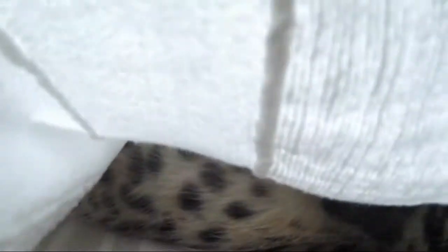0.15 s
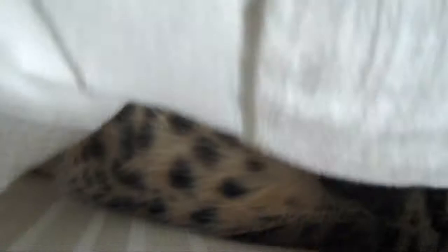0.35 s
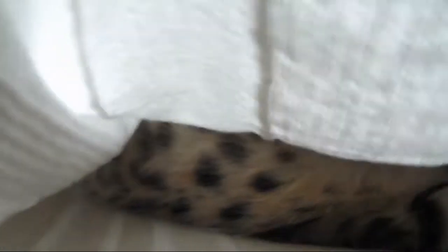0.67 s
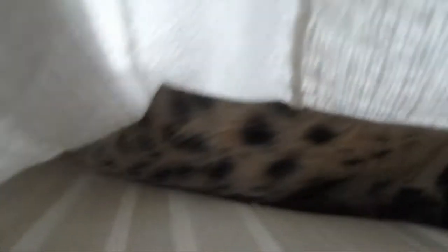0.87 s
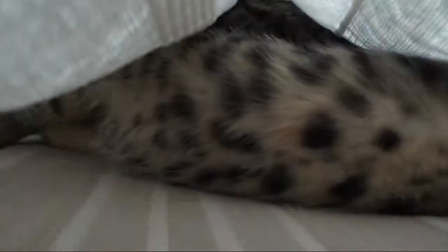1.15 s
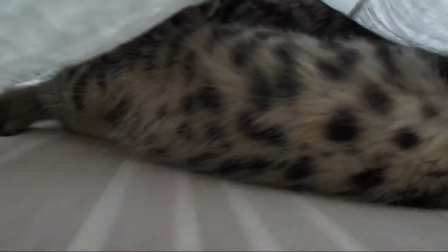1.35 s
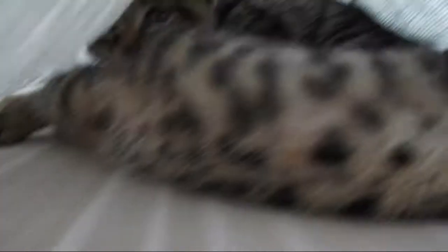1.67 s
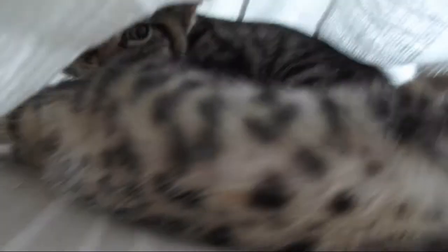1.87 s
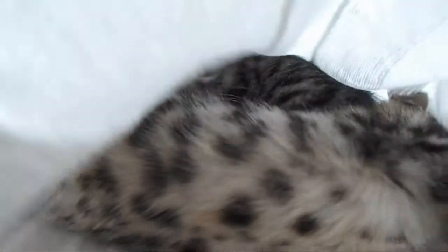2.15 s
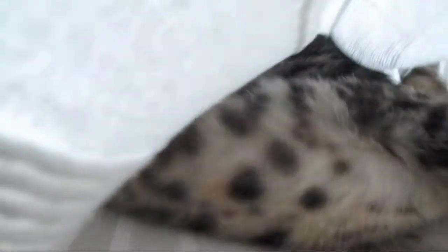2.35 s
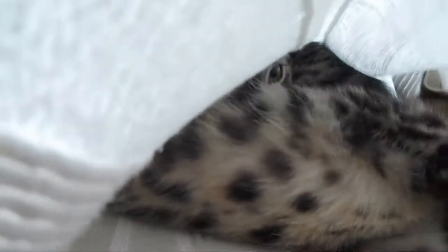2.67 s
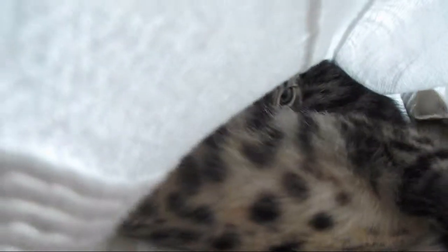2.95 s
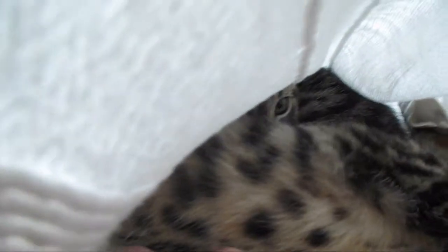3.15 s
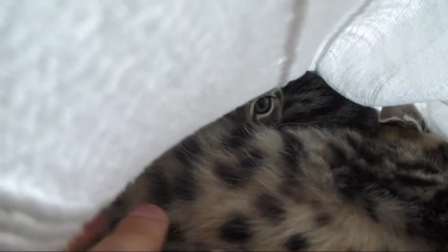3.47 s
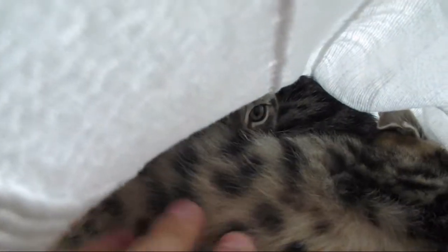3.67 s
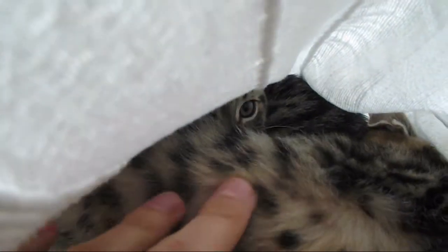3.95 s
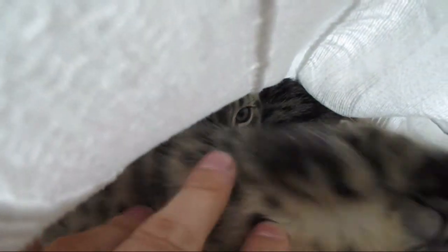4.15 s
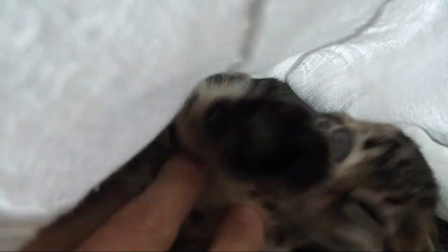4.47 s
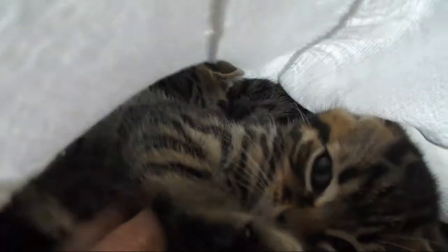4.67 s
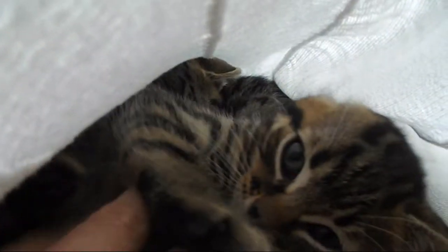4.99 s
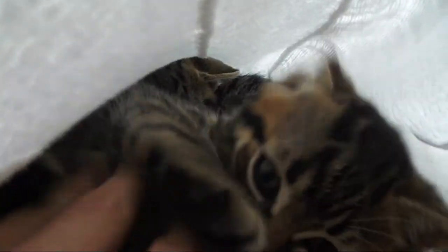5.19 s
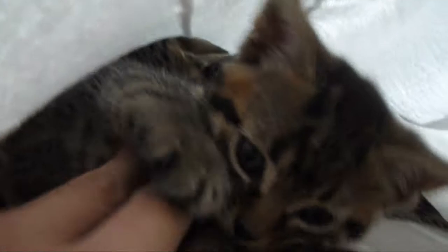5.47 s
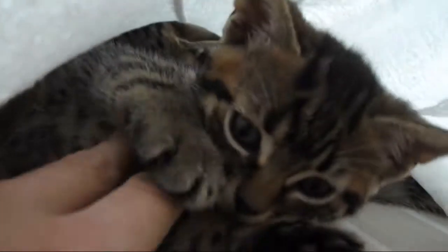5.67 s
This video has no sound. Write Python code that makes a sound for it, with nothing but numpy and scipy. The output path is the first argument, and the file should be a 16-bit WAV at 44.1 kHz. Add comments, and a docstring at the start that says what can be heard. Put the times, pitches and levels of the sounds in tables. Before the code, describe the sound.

Very close handling noise under a sheet: muffled thumps, dry hard snaps, a burst of fabric scraping, faint fur stroking and constant hiss.

```python
"""The case of a small handheld camera clicks, creaks and bumps as cloth brushes it among bedding.
Snapping seams ring panel and shell modes; sliding cloth is a mass of tiny thread slips plus a low push.
The camera sways and shuffles, a hand strokes a kitten's fur and the sheet, and hiss runs throughout.
The hardest clicks overload the microphone, and its gain control ducks for a moment after them."""
import sys
import numpy as np
from scipy import signal
from scipy.fft import rfft, irfft
from scipy.io import wavfile

SR = 44100
rng = np.random.default_rng(int(sys.argv[2]) if len(sys.argv) > 2 else 0)


def dump(signal):
    """Clip the signal to [-1, 1] and save it as 16-bit WAV at the path in sys.argv[1]."""
    limited = np.clip(np.atleast_2d(signal).T, -1, 1)
    pcm = np.round(limited * 32767).astype(np.int16)
    wavfile.write(sys.argv[1], SR, pcm)


N = 256662
TIME_S = np.arange(N) / SR
BIN_HZ = np.fft.rfftfreq(N, 1 / SR)

# All levels are ahead of the gain control.
# Seam snaps: t/s, panel peak level/dB, panel f/Hz, panel t60/s, shell peak re panel/dB
CLICKS = [(0.5052, -3, 2450, 0.014, -13), (.5060, -11, 4200, 0.015, -21), (.5180, -17, 2700, 0.026, -17),
          (0.5704, -18, 4120, 0.011, 0), (1.0172, -20, 1770, 0.0035, -4), (1.0967, -17, 2220, .012, 14.5),
          (1.1009, 10, 4150, 0.006, -6.5), (1.1039, 2.5, 2640, 0.0054, -7), (1.1054, 2, 1720, 0.011, -11),
          (1.1223, -15, 4700, 0.011, 2.5), (1.1777, -27.5, 1180, .008, 2), (1.2047, -21, 3120, .0056, 2),
          (1.2502, -22, 980, 0.026, 0), (1.5220, -12.5, 2170, 0.019, -2.5),
          (1.5327, -13.5, 1860, 0.018, -2.5), (1.6735, -33.5, 2000, 0.0041, 12),
          (2.6449, 14, 4175, 0.026, 0), (2.6470, 1, 1900, 0.012, 6), (2.657, 12.5, 4100, 0.0042, -16),
          (2.6669, 9.5, 4200, 0.0055, -4.5), (2.6681, -7, 940, .007, -2), (2.9605, -16.5, 4300, 0.012, -9),
          (4.4914, -19, 4270, .007, -17)]
# Case modes: f/Hz, relative level/dB, t60/s
SHELL_MODES = [(470, -28, 0.049), (863, -15, 0.015), (1100, -8, 0.0043), (1700, -5, 0.0053),
               (2345, 0.5, 0.0053), (3170, 4, 0.0019), (3910, 0, 0.0043), (4197, 5, 0.0037),
               (5160, -12, 0.021), (6500, -5, 0.0016), (7400, 2.5, 0.00087), (11400, -3.5, 0.0011)]
# Stick-slip squeak of the case: t/s, f/Hz, level/dB
SQUEAK = [(2.692, 2410, -25), (2.704, 2500, -20), (2.713, 2480, -19), (2.722, 2510, -32)]
# Squeak partials: multiple of f, relative level/dB
SQUEAK_PARTIALS = [(1, -5), (2, -2.5), (3, -13)]
# Soft blows on the case: t/s, peak level/dB, half width/s
BUMPS = [(0.1029, -13, 0.0011), (.1235, -29.5, 0.006), (0.1763, -23.5, .0015), (.217, -32, .0078),
         (0.3092, -23.5, 0.0012), (0.378, -27.5, 0.0098), (1.02, -28.5, 0.0066), (2.0338, -23, 0.0021),
         (2.0546, -23, .0016), (4.3848, -28, 0.0017), (4.5045, -22, 0.0041), (5.305, -35, .0018),
         (5.431, -34.5, 0.0011)]
# Cloth slides on the case: t/s, length/s, level before tension gains/dB, tautness (0 slack, 1 stretched)
BRUSHES = [(0.5, 0.097, -37, 0.45), (.658, .03, -37.5, .35), (1.878, 0.028, -37.5, 0.3),
           (2.028, 0.093, -28.5, 0.094), (2.113, 0.038, -35, .05), (2.146, .083, -29.5, 0.26),
           (2.223, 0.072, -39.5, 0.17), (2.336, .11, -32.5, 0.19), (2.544, 0.18, -34.5, 0.22),
           (2.648, 0.054, -18.5, 0.74), (2.701, 0.11, -32, 0.24), (2.79, 0.026, -32, 1.0),
           (2.813, 0.25, -36, 0.18), (2.948, 0.033, -39.5, 0.35), (3.82, .09, -44.5, 0.18),
           (4.474, 0.054, -42.5, 0.076)]
# Bedding shifting under the hand that holds the camera: t/s, level/dB
SHIFTING = [(0, -44.5), (.5, -49), (.75, -53), (1.05, -43.5), (1.2, -54), (1.75, -52), (2.1, -45.5),
            (2.5, -46), (2.92, -35), (3.1, -44.5), (3.85, -48), (4.2, -54), (4.45, -43.5), (4.8, -54.5),
            (5.15, -54.5), (5.3, -46.5), (5.55, -51.5), (5.82, -50)]
# Other hand stroking fur and sheet: t/s, level before the trim in stroking()/dB
STROKING = [(0, -41), (.65, -37.5), (.8, -43), (1.05, -44), (1.6, -47), (3.5, -51.5), (4.3, -41.5),
            (4.75, -40.5), (5.1, -54), (5.82, -73)]
# Resonances of the hollow in front of the microphone: f/Hz, width/Hz, lift/dB
CAVITY = [(1696, 290, 10), (2338, 224, 11.5), (2558, 85, 8), (2944, 540, 6.5), (3743, 270, 8),
          (4302, 590, 16), (4763, 393, 9), (5300, 110, 10), (6190, 850, 7.5), (8340, 640, 4),
          (9520, 770, 11.5), (10850, 530, 6)]
# Relative spectrum of hiss and stroking, before the cavity: f/Hz, density/dB
HISS_SPECTRUM = [(20, 19.5), (100, -1), (280, 1), (600, -6), (1200, -6), (2400, -5.5), (4600, -7.5),
                 (5550, -16.5), (7500, -14), (10400, -18.5), (12300, -21), (15600, -27)]
# Relative spectrum of rasping threads, before the cavity: f/Hz, density/dB
CLOTH_SPECTRUM = [(200, -5), (600, -17), (1050, -9.5), (1750, 2.5), (2400, -3), (3400, -9.5), (3950, 2.5),
                  (4600, -1.5), (5200, -6.5), (5700, -16), (7600, -17), (8600, -14.5), (11000, -26),
                  (15600, -37)]
# Relative spectrum of cloth pushing on the case: f/Hz, density/dB
PUSH_SPECTRUM = [(20, -21), (60, 8), (140, 7), (300, 0.5), (550, -3.5), (1200, -17.5), (3000, -80)]
# Relative spectrum of the swaying camera: f/Hz, density/dB
SWAY_SPECTRUM = [(8, 7.5), (25, -1), (55, 2.5), (100, -5), (200, -42), (600, -64)]
# Relative spectrum of the shuffling camera: f/Hz, density/dB
SHUFFLE_SPECTRUM = [(30, -29), (120, -3), (260, -7), (500, -14.5), (1100, -22.5), (3000, -38)]

RECOIL_DB, RECOIL_S = -27.5, 0.00047  # case jolt from a click: re click, half width
SCUFF_DB, SCUFF_S = -17.5, 0.012  # cloth crushed by a bump: re bump, decay time constant
CATCH_S, SLOWING_SHARE = 0.0044, 0.5  # a fold starts at once, slows over this share of its slide
SLACK_PUSH_DB, TAUT_PUSH_DB = 3.5, -22  # taut cloth hardly pushes
SLACK_EDGE_DB, TAUT_EDGE_DB = 0.5, 14  # taut threads rasp more sharply
SETTLE_RISE_S, SETTLE_S = 0.0053, 0.052  # rocking on the mattress after a bump
BUMP_SWAY_DB, BUMP_SHUFFLE_DB = -7.5, -33  # re bump, before the settling envelope
DRAG_SWAY_DB = -9  # sway under a sliding fold, re its push
QUIET_DB, SWAY_DB_PER_DB = -49.5, 0.49  # sway slope against shifting, pivot at the quiet level
HISS_DB = -39.5
BAND_EDGE_HZ = 15800


def gain_of(db):
    """Decibels to amplitude."""
    return 10 ** (np.asarray(db) / 20)


def evened(x):
    """Scales to rms 1."""
    return x / np.sqrt(np.mean(x ** 2) + 1e-20)


def spectrum_db(points):
    """Interpolates a short dB spectrum over all bins, on a log frequency axis."""
    f_hz, db = np.transpose(points)
    return np.interp(np.log(BIN_HZ + 1), np.log(f_hz + 1), db)


def coloured(x, db):
    """Filters x by a dB spectrum, then scales to rms 1."""
    return evened(irfft(rfft(x) * gain_of(db), N))


def follow(rows, axis=1):
    """One dB column of a timed curve as a gain per sample."""
    columns = np.transpose(rows)
    return gain_of(np.interp(TIME_S, columns[0], columns[axis]))


def wander(rate_hz):
    """Slow random drift of rms 1: noise under a Gaussian low-pass."""
    white = rng.standard_normal(N)
    return evened(irfft(rfft(white) * np.exp(-(BIN_HZ / rate_hz) ** 2), N))


def add(mix, start_s, sound):
    """Mixes a sound in, in place, cut at the end of the mix."""
    part = mix[round(start_s * SR):][:len(sound)]
    part += sound[:len(part)]


def fibres(per_s, spread_db, clump_db, clump_hz):
    """Threads catch and let go: tiny slips of uneven size that come in clumps."""
    excess = np.minimum(rng.exponential(1, N), 4)
    size = gain_of(spread_db * excess) * rng.standard_normal(N)
    slips = rng.random(N) < per_s / SR
    return evened(size * slips * gain_of(clump_db * wander(clump_hz)))


def cavity_db():
    """Lift by the hollow in front of the microphone: a sum of resonant peaks."""
    lift_db = np.zeros(len(BIN_HZ))
    for f_hz, width_hz, peak_db in CAVITY:
        lift_db += peak_db / (1 + (2 * (BIN_HZ - f_hz) / width_hz) ** 2) ** 0.92
    return lift_db


def clicks(contact_cycles=0.095, grit=0.18, grit_s=0.0029, panel_grit=0.62, scatter=0.0099):
    """A seam snaps: one panel rings briefly, and the snap with its trailing grit shakes the shell."""
    t = np.arange(SR // 20) / SR
    out = np.zeros(N)
    for start_s, db, panel_hz, t60_s, shell_db in CLICKS:
        contact = t * panel_hz / contact_cycles  # a lower panel lets go more slowly
        snap = contact * np.exp(-contact)
        trail = grit * rng.standard_normal(len(t)) * np.exp(-t / grit_s)
        scrape = signal.fftconvolve(snap, trail)[:len(t)]

        flex = np.cos(2 * np.pi * panel_hz * t) * gain_of(-60 * t / t60_s)
        panel = signal.fftconvolve(snap + panel_grit * scrape, flex)[:len(t)]

        detune = 1 + scatter * rng.standard_normal(len(SHELL_MODES))
        modes = np.zeros(len(t))
        for k, (f_hz, mode_db, ring_s) in enumerate(SHELL_MODES):
            phase = 2 * np.pi * f_hz * detune[k] * t + k * np.pi  # alternating sign
            modes += gain_of(mode_db - 60 * t / ring_s) * np.cos(phase)
        shell = signal.fftconvolve(snap + scrape, modes)[:len(t)]

        ring = panel / abs(panel).max() + gain_of(shell_db) * shell / abs(shell).max()
        add(out, start_s, gain_of(db) * ring)
    return out


def squeak(jitter=0.0123, jitter_hz=680, flutter_db=2.5, flutter_hz=300):
    """Slips briefly fall into step: a rough, rising harmonic tone."""
    t_s, f_hz, _ = np.transpose(SQUEAK)
    pitch_hz = np.interp(TIME_S, t_s, f_hz) * (1 + jitter * wander(jitter_hz))
    turns = np.cumsum(pitch_hz) / SR
    tone = sum(gain_of(db) * np.sin(2 * np.pi * round(k) * turns) for k, db in SQUEAK_PARTIALS)
    rough = evened(tone * gain_of(flutter_db * wander(flutter_hz)))
    sounding = (TIME_S > t_s[0]) * (TIME_S < t_s[-1])
    return follow(SQUEAK, axis=2) * sounding * rough


def bumps():
    """A padded blow or a click's recoil moves the microphone in and back: one swing of pressure."""
    out = np.zeros(N)
    recoils = [(start_s, db + RECOIL_DB, RECOIL_S) for start_s, db, *_ in CLICKS]
    for centre_s, db, width_s in BUMPS + recoils:
        u = np.arange(-4 * width_s, 4 * width_s, 1 / SR) / width_s
        add(out, centre_s - 4 * width_s, -gain_of(db) * u * np.exp((1 - u ** 2) / 2))
    return out


def scuffs():
    """Each bump crushes a fold of cloth against the case: decaying thread slips."""
    t = np.arange(SR // 5) / SR
    crush = np.zeros(N)
    for start_s, db, _ in BUMPS:
        add(crush, start_s, gain_of(db + SCUFF_DB) * np.exp(-t / SCUFF_S))
    slips = fibres(per_s=2500, spread_db=4.5, clump_db=2.0, clump_hz=60)
    return crush * coloured(slips, spectrum_db(PUSH_SPECTRUM))


def swell(length_s):
    """Loudness of one slide: the root of a speed that builds up and dies away."""
    t = np.arange(round(length_s * SR)) / SR
    slowing = (1 - t / length_s) / SLOWING_SHARE
    return np.sqrt(np.minimum(1, np.minimum(t / CATCH_S, slowing)))


def tension(taut):
    """Gains of low push and sharp edge: stretching cloth trades one for the other."""
    push_db = SLACK_PUSH_DB + taut * (TAUT_PUSH_DB - SLACK_PUSH_DB)
    edge_db = SLACK_EDGE_DB + taut * (TAUT_EDGE_DB - SLACK_EDGE_DB)
    return gain_of(push_db), gain_of(edge_db)


def brushes(cavity_share=0.16, edge_hz=3300):
    """Threads rasp on the case, sharper when taut, while coarser folds rumble through it."""
    threads = fibres(per_s=7000, spread_db=1.5, clump_db=1.7, clump_hz=170)
    folds = fibres(per_s=740, spread_db=0.0, clump_db=-2.2, clump_hz=40)
    rasp = coloured(threads, spectrum_db(CLOTH_SPECTRUM) + cavity_share * cavity_db())
    body = irfft(rfft(rasp) / (1 + (BIN_HZ / edge_hz) ** 8), N)
    edge = rasp - body
    push = coloured(folds + 0.87 * threads, spectrum_db(PUSH_SPECTRUM))
    out = np.zeros(N)
    for start_s, length_s, db, taut in BRUSHES:
        push_gain, edge_gain = tension(taut)
        slide = gain_of(db) * swell(length_s)
        first = round(start_s * SR)
        span = slice(first, first + len(slide))
        add(out, start_s, slide * (body[span] + edge_gain * edge[span] + push_gain * push[span]))
    return out


def grip(sway_db=-46.5, shuffle_db=0):
    """Camera sways and shuffles on the mattress: gently all along, more after bumps; cloth drag adds sway."""
    t = np.arange(SR) / SR
    settling = (1 - np.exp(-t / SETTLE_RISE_S)) * np.exp(-t / SETTLE_S)
    rocking, drag = np.zeros(N), np.zeros(N)
    for start_s, db, _ in BUMPS:
        add(rocking, start_s, gain_of(db) * settling)
    for start_s, length_s, db, taut in BRUSHES:
        push_gain, _ = tension(taut)
        add(drag, start_s, gain_of(db) * push_gain * swell(length_s))

    shifting = follow(SHIFTING)
    sway = coloured(rng.standard_normal(N), spectrum_db(SWAY_SPECTRUM))
    unsteady = gain_of(sway_db) * (shifting / gain_of(QUIET_DB)) ** SWAY_DB_PER_DB
    pushed = gain_of(BUMP_SWAY_DB) * rocking + gain_of(DRAG_SWAY_DB) * drag

    slips = fibres(per_s=2700, spread_db=1.0, clump_db=3.5, clump_hz=30)
    shuffle = coloured(slips, spectrum_db(SHUFFLE_SPECTRUM))
    shuffle_gain = np.hypot(gain_of(shuffle_db) * shifting, gain_of(BUMP_SHUFFLE_DB) * rocking)
    return sway * np.hypot(unsteady, pushed) + shuffle * shuffle_gain


def stroking(low_hz=1500, trim_db=-1):
    """Fur and soft cotton: a fine fizz of thread slips with the bass cut."""
    slips = fibres(per_s=9000, spread_db=4.0, clump_db=3.5, clump_hz=44)
    bass_cut_db = 10 * np.log10(1 + (low_hz / (BIN_HZ + 1)) ** 4)
    fizz = coloured(slips, spectrum_db(HISS_SPECTRUM) + cavity_db() - bass_cut_db)
    return gain_of(trim_db) * follow(STROKING) * fizz


def hiss(waver_db=0.87, waver_hz=14):
    """Continuous noise coloured by the cavity, wavering slightly in level."""
    air = coloured(rng.standard_normal(N), spectrum_db(HISS_SPECTRUM) + cavity_db())
    return gain_of(HISS_DB + waver_db * wander(waver_hz)) * air


def scene():
    """Close and dry under the sheet; one microphone feeds both sides, the left a sample late."""
    case = clicks() + squeak() + bumps() + scuffs()
    sound = case + brushes() + grip() + stroking() + hiss()
    return np.array([np.append(0, sound[:-1]), sound])


def lagged(x, lag_s):
    """One-pole smoothing."""
    r = np.exp(-1 / (lag_s * SR))
    return signal.lfilter([1 - r], [1, -r], x)


def record(dry, threshold_db=-21, squeeze_db_per_db=0.44, recover_db_per_s=62,
           sense_s=0.014, attack_s=0.0023):
    """Gain control acts late and recovers slowly; what escapes it overloads; then the band limit."""
    power_db = 10 * np.log10(lagged((dry ** 2).mean(0), sense_s) + 1e-12)
    fall_db = TIME_S * recover_db_per_s
    held_db = np.maximum.accumulate(power_db + fall_db) - fall_db  # peak hold, linear dB release
    over_db = np.maximum(held_db - threshold_db, 0)
    ducked = dry * gain_of(-squeeze_db_per_db * lagged(over_db, attack_s))
    clipped = ducked / (1 + ducked ** 6) ** (1 / 6)
    low_pass = signal.firwin(255, BAND_EDGE_HZ, window=("kaiser", 8), fs=SR)
    return signal.oaconvolve(clipped, low_pass[None], "same")


dry = scene()
out = record(dry)
dump(out)
```